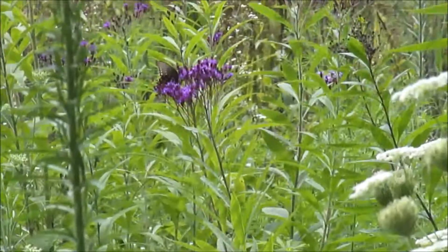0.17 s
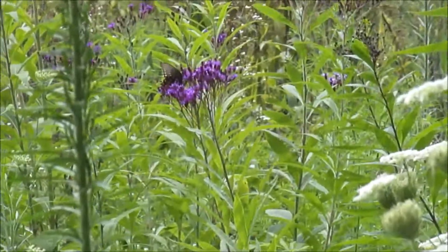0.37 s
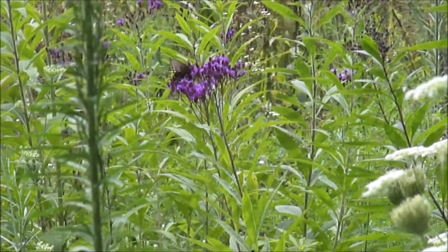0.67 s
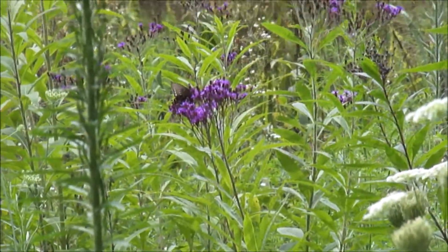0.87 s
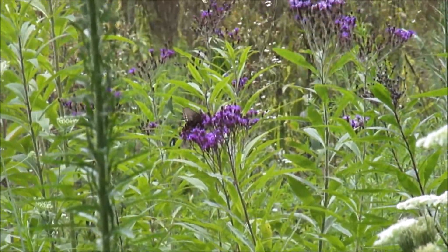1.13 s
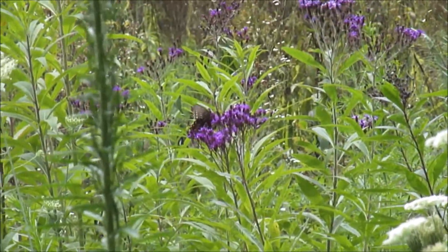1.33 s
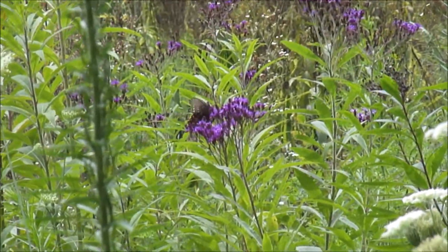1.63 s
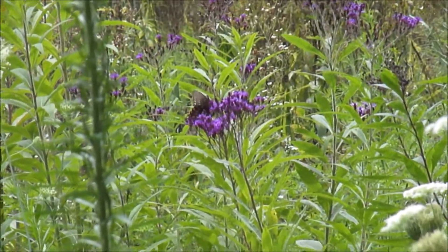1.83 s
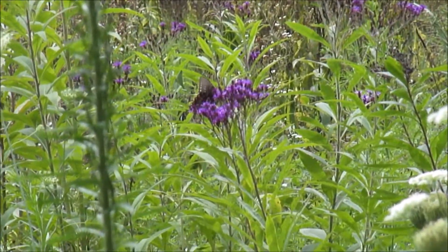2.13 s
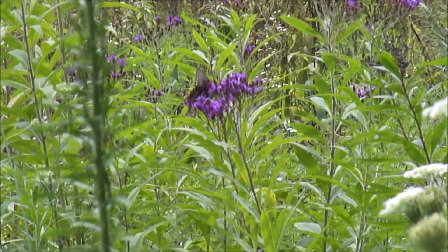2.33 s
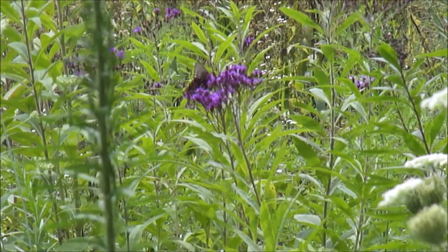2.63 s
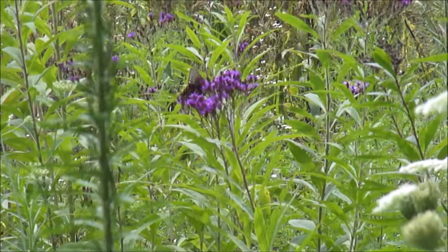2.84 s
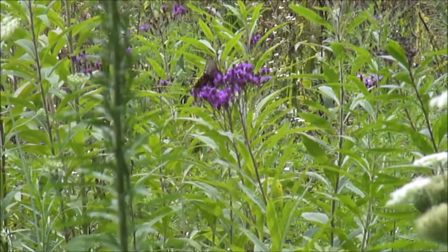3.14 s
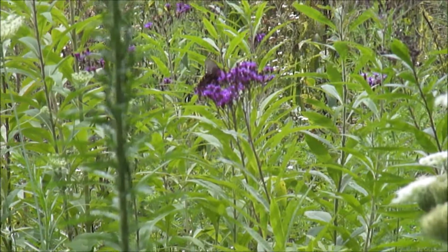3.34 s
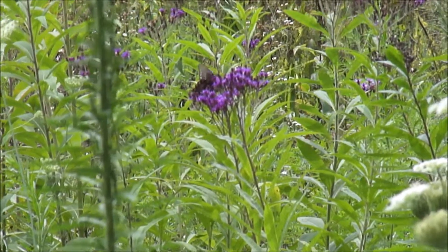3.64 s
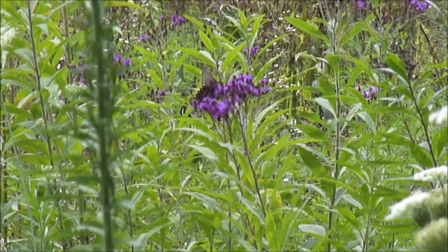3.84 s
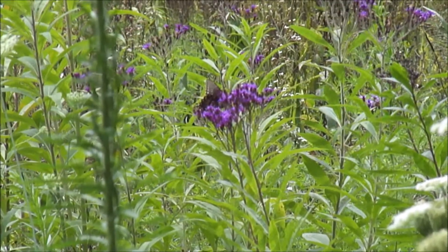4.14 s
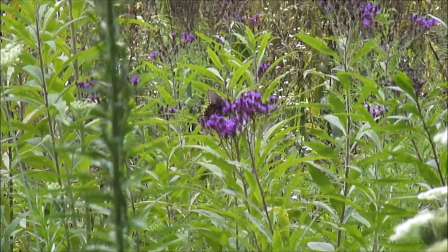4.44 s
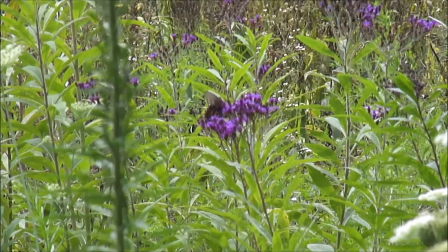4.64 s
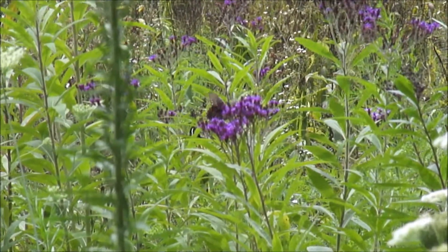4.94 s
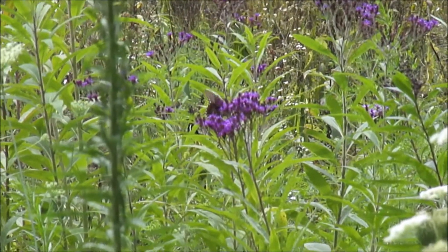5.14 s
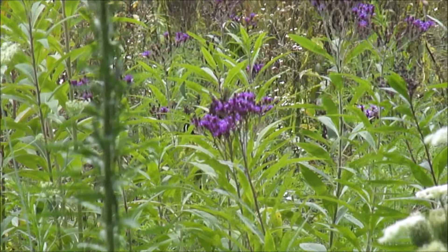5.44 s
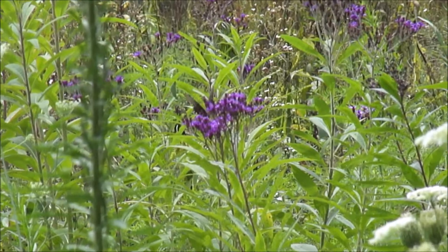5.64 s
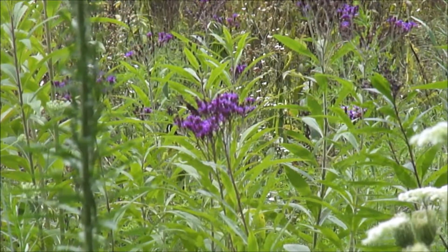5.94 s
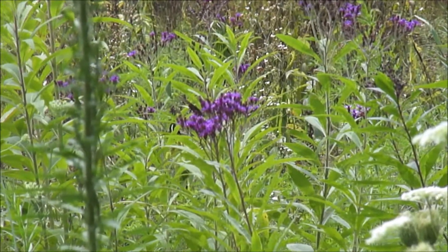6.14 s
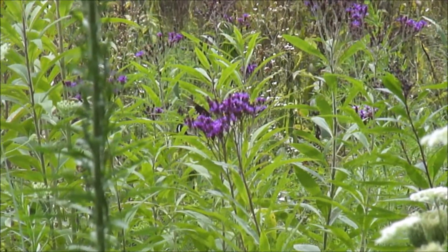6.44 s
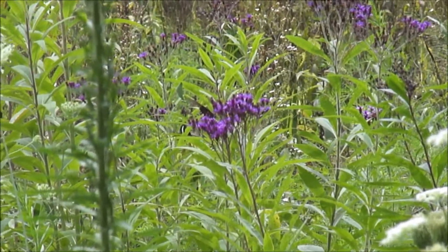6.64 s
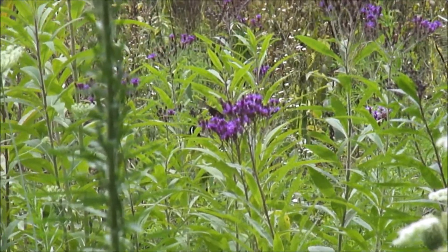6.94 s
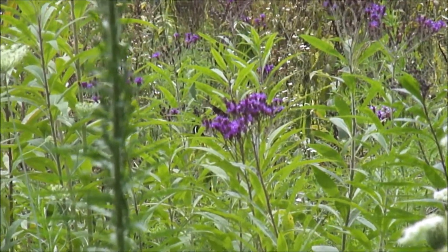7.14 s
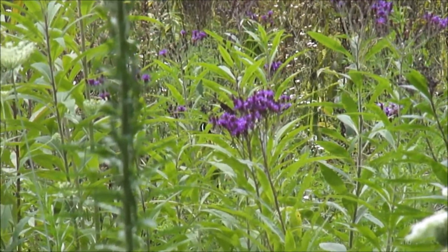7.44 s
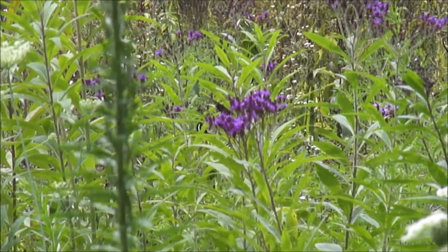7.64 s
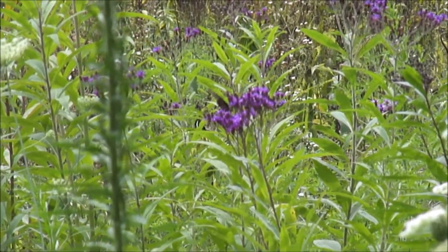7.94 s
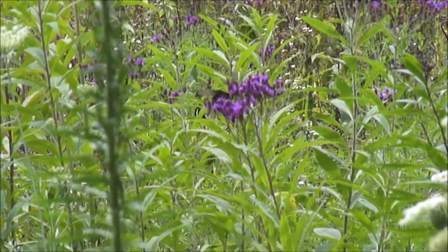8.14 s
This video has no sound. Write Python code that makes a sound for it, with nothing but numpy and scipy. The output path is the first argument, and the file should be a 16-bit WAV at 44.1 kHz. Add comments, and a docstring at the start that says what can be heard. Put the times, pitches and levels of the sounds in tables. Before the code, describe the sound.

A near cicada throbs faster and fades away over a dense, sizzling meadow chorus of crickets and katydids, with a faint distant road murmur.

```python
"""A summer meadow, one microphone. Close by, a cicada throbs faster and fades: clicks ring its tymbals and belly.
Farther off, coloured noise and tiny rasps make a dense chorus; pulsed tones make trilling crickets, a thin one late.
Katydids buzz at the top as noise cut by wing strokes. A distant road murmurs underneath as dark noise, with
wavering tones for tyre hum and an engine's whine. One light tick is heard, and the sound around the insects'
buzz dips briefly now and then."""
import sys
import numpy as np
from scipy import signal
from scipy.fft import rfft, irfft
from scipy.io import wavfile
from scipy.ndimage import uniform_filter1d

SR = 44100
rng = np.random.default_rng(int(sys.argv[2]) if len(sys.argv) > 2 else 0)


def master_out(mix):
    """Clip the mix to full scale and print it as 16-bit PCM to the path in sys.argv[1]."""
    frames = np.transpose(np.atleast_2d(mix))
    ceiling = np.clip(frames, -1, 1)
    pcm = np.round(ceiling * 32767).astype(np.int16)
    wavfile.write(sys.argv[1], SR, pcm)


N = 366030
TIME = np.arange(N) / SR  # s

# the near cicada's tymbal ring: f/Hz, relative density/dB per Hz
TYMBAL_SPECTRUM = [(1800, -37), (2500, -12), (3200, -16.5), (4300, -6.5), (5700, -13), (6300, 4),
                   (6550, 2.5), (6800, -2), (7050, 3), (7350, 5), (7650, -4), (8000, 3), (8600, -3.5),
                   (9700, -19.5), (10600, -48)]
# what its abdomen radiates well, as a relative spectrum: f/Hz, gain/dB
BELLY_RADIATION = [(1500, -38), (2600, 0), (3200, 12), (3400, 3.5), (3700, 6), (4200, -7), (4500, -10.5),
                   (4950, 6.5), (5650, 0.5), (6100, -2), (6500, -2.5), (7000, -2), (9000, -18)]
# how fast it throbs: t/s, throb rate/Hz
CICADA_THROBS = [(0, 7.785), (.6, 8.117), (1.6, 8.469), (2.3, 10.724), (3, 12.53), (3.6, 12.27), (5, 14.1)]
# its song holds, then dies away: t/s, level/dB
CICADA_LEVEL = [(0, -25), (1.1, -24.5), (2.1, -24), (3.1, -26.5), (3.55, -28), (4, -32), (4.35, -36.5),
                (4.9, -37.5), (5.5, -55)]
FIRST_THROB_S = .061


def cicada(cycles_per_s=366, full_lift_per_s=9.1, tymbal_db=0.5, belly_db=-4.0, ground_share=0.25):
    """Buckling tymbals click; with each throb the abdomen lifts and its resonance sweeps up and back."""
    rate = curve(CICADA_THROBS)[0]
    throb = np.cumsum(rate) / SR
    throb = throb - np.interp(FIRST_THROB_S, TIME, throb)
    lift = (.5 + .5 * np.cos(2 * np.pi * throb)) ** 2
    # between quick throbs the abdomen has no time to sink all the way
    depth = np.minimum(full_lift_per_s / rate, 1) ** .5
    lift = 1 - depth * (1 - lift)

    # the buckling slows a little as the abdomen lifts, and jitters
    unsteadiness = 1 - .08 * (lift - .5) + .026 * drift(120)
    cycles = np.cumsum(cycles_per_s * unsteadiness) / SR
    # two ribs buckle in each cycle; the first is stronger and does most to drive the abdomen
    rib = np.floor(2 * cycles)
    snap_size = gain_of(1.45 * rng.standard_normal(N))
    snaps = np.diff(rib, prepend=0) * rng.choice([-1, 1], N) * snap_size
    first = snaps * (1 - rib % 2)
    second = snaps * (rib % 2)

    belly_hz, width_hz = 4100 + 1800 * lift, 1350
    belly = resonate(first + .4 * second, belly_hz, width_hz)
    belly = resonate(belly, belly_hz, width_hz) * gain_of(6.5 * lift)
    tymbal = colour(first + .8 * second, TYMBAL_SPECTRUM) * gain_of(1.1 * (lift - .5))
    song = gain_of(tymbal_db) * tymbal + gain_of(belly_db) * colour(belly, BELLY_RADIATION)
    # the ground's echo, 1/468 s late, combs the spectrum
    ground = np.roll(song, round(SR / 468))
    song = scatter(song + ground_share * ground, t60=.08, wet_db=-4.5)
    return gain_of(curve(CICADA_LEVEL)[0]) * evened(song)


# the far chorus: f/Hz, relative density/dB per Hz
CHORUS_SPECTRUM = [(1120, -76), (1900, -27), (2320, -17.5), (2830, -9), (3500, -4.5), (4050, -1.5),
                   (4390, -2.5), (5680, -1.5), (8080, 0.5), (8510, -1.5), (8760, -15), (9430, -16),
                   (9640, -20), (11000, -23.5), (14300, -60), (22000, -120)]
# its mean level: t/s, level/dB
CHORUS_LEVEL = [(0, -29), (2.5, -29), (3.5, -32.5), (4.3, -30), (5, -29.5), (5.6, -30), (6.3, -30.5),
                (7, -30.5), (7.6, -30.5), (8.3, -31.5)]
# the lower-voiced part of the chorus: f/Hz, relative density/dB per Hz
LOW_CHORUS_SPECTRUM = [(1900, -33.5), (2600, -13), (3300, -12.5), (3700, -8.5), (4050, -8), (4350, -5.5),
                       (4700, -24), (5500, -41)]
# its mean level: t/s, level/dB
LOW_CHORUS_LEVEL = [(0, -40), (2, -43), (3.5, -38), (4.5, -37.5), (5.3, -39), (6.2, -39.5), (6.8, -41),
                    (7.4, -46), (8.3, -50)]


def chorus(rasps_per_s=2500, rasp_db=-5, rasp_size_db=3):
    """Countless far insects merge into a sizzle; the nearer ones stand out as tiny rasps."""
    moments = rng.random(N) < rasps_per_s / SR
    sizes = gain_of(rasp_size_db * np.minimum(rng.exponential(1, N), 4))
    rasps = moments * rng.choice([-1, 1], N) * sizes
    sizzle = rng.standard_normal(N) + gain_of(rasp_db) * evened(rasps)
    high = strands(colour(sizzle, CHORUS_SPECTRUM), patchy_db=3.0)
    high = high * gain_of(curve(CHORUS_LEVEL)[0] + 0.35 * drift(33))
    low = colour(rng.standard_normal(N), LOW_CHORUS_SPECTRUM)
    low = low * strokes(10, wander=0.14, sharpness=0.27)
    return high + low * gain_of(curve(LOW_CHORUS_LEVEL)[0] + 0.95 * drift(16))


def strands(x, patchy_db, width_hz=40, length_s=.25):
    """Narrow strands of pitch come forward and sink back as single singers do."""
    hz, s, z = signal.stft(x, SR, nperseg=2048, noverlap=1536)
    bins = max(round(width_hz / hz[1]), 1)
    frames = max(round(length_s / s[1]), 1)
    patches = uniform_filter1d(rng.standard_normal(z.shape), bins, axis=0)
    patches = evened(uniform_filter1d(patches, frames, axis=1))
    patchy = signal.istft(z * gain_of(patchy_db * patches), SR, nperseg=2048, noverlap=1536)[1]
    return evened(patchy[:N])


# single trilling crickets: mean f/Hz, mean wing-stroke rate/Hz, level/dB
STEADY_CRICKETS = [(7840, 29.6, -42), (7370, 58, -44.5), (6870, 63, -47.5), (6490, 30, -45),
                   (4117, 41, -45.5), (3155, 52, -50.5), (4935, 47, -46)]
# the late thin trill: t/s, level/dB
LATE_TRILL_LEVEL = [(0, -90), (6.4, -78), (6.7, -63), (7, -51), (7.6, -52.5), (8.3, -48)]


def crickets():
    """Wing strokes pulse each singer's tone: the steady trillers and the late high one."""
    steady = sum(gain_of(db) * cricket(hz, per_s, spread=.018) for hz, per_s, db in STEADY_CRICKETS)
    late = cricket(hz=9160, per_s=62, spread=0.0098)
    return steady + gain_of(curve(LATE_TRILL_LEVEL)[0]) * late


def cricket(hz, per_s, spread):
    """A scraper drawn over the wing's file: a pulsed tone whose pitch is never quite steady."""
    pitch = hz * (1 + spread * drift(151.8))
    tone = np.sin(2 * np.pi * np.cumsum(pitch) / SR)
    trill = tone * strokes(per_s, wander=0.0218, sharpness=0.92)
    return evened(scatter(trill, t60=0.089, wet_db=-3))


# the katydids' buzz: f/Hz, relative density/dB per Hz
KATYDID_SPECTRUM = [(7500, -25), (8800, 10.5), (9400, -0.5), (10200, 3), (11000, -1), (12000, -22)]
# their song: t/s, level/dB, mean wing-stroke rate/Hz
KATYDID_STROKES = [(0, -38.5, 174), (1.2, -38.5, 184), (2.9, -40, 182), (3.3, -41, 141), (4.5, -45, 120),
                   (5.6, -45.5, 119.5), (5.85, -58, 122), (8.3, -70, 120)]


def katydids():
    """Quick wing strokes, each a dry rasp of noise."""
    db, per_s = curve(KATYDID_STROKES)
    rasps = rng.standard_normal(N) * strokes(per_s, wander=0.0139, sharpness=0.44)
    return gain_of(db) * colour(rasps, KATYDID_SPECTRUM)


# a small tick, as of a finger on the equipment: f/Hz, relative level/dB, t60/s
TICK_RING = [(514, 0.5, 0.027), (720, 1, 0.0091), (1000, 2, 0.0083), (1300, -6, 0.0075), (1620, 2.5, 0.016)]
TICK_S, TICK_DB = 1.7895, -32.5


def tick(low_hz=400, high_hz=2000):
    """One light, bodiless knock: a few modes that die at once, band-limited."""
    t = np.maximum(TIME - TICK_S, 0)
    ring = 0
    for hz, db, t60 in TICK_RING:
        ring = ring + gain_of(TICK_DB + db - 60 * t / t60) * np.sin(2 * np.pi * hz * t)
    return signal.sosfilt(signal.butter(2, [low_hz, high_hz], "bandpass", fs=SR, output="sos"), ring)


# the distant road's murmur: f/Hz, relative density/dB per Hz
ROAD_SPECTRUM = [(15, -60), (25, -24), (140, -10), (353, -5), (403, -6.5), (435, -5.5), (612, -5.5),
                 (685, -3.5), (753, -5.5), (963, -7.5), (1060, -7), (1260, -10), (1670, -10), (1940, -13.5),
                 (2300, -12), (2990, -37), (5060, -120)]
ROAD_DB = -49.5
# the tyre hum's tones: f/Hz, width/Hz, relative level/dB, share of the swell (in dB) that each follows
TYRE_TONES = [(699, 3.1, -0.5, 0.93), (1044, 12.1, 0, 0.57), (1097, 26, -10.5, 0.91), (1720, 38, -4, 0.22),
              (1565, 19, -9, .2), (511, 5.4, -10, 0.81)]
# the hum swells over a faint steady level: start t/s, length/s, full-share level/dB
TYRE_SWELLS = [(1.12, 0.18, -58), (2.8, 0.76, -57.5), (3.75, 0.79, -51), (4.45, 1.15, -53.5),
               (5.6, 1.15, -53), (7.55, .85, -53.5)]
HUM_REST_DB = -66.5
# an engine's brief whines over a fainter steady tone: start t/s, length/s, level/dB
ENGINE_WHINES = [(7.02, .3, -55), (7.85, 0.21, -58)]
WHINE_HZ, WHINE_WIDTH_HZ, WHINE_REST_DB = 443.5, 4, -65


def road(unsteady_db=1.45):
    """A soft murmur of noise; narrow tones of tyre hum and an engine's whine swell and sink over it."""
    murmur = colour(rng.standard_normal(N), ROAD_SPECTRUM) * gain_of(ROAD_DB + unsteady_db * drift(22))
    swell_db = swells(TYRE_SWELLS, HUM_REST_DB)
    hum = 0
    for hz, width, db, share in TYRE_TONES:
        hum = hum + gain_of(HUM_REST_DB + db + share * swell_db) * far_tone(hz, width)
    whine_db = WHINE_REST_DB + swells(ENGINE_WHINES, WHINE_REST_DB)
    return murmur + hum + gain_of(whine_db) * far_tone(WHINE_HZ, WHINE_WIDTH_HZ)


def swells(rows, rest_db, edge_s=.1):
    """Decibels above a resting level: each swell rises, holds and falls."""
    rises = []
    for start, length, db in rows:
        inside = np.minimum(TIME - start, start + length - TIME)  # s from the nearer end
        rises.append((db - rest_db) * np.clip(.5 + inside / edge_s, 0, 1))
    return np.max(rises, axis=0)


def far_tone(hz, width, fading_db=2.5):
    """A narrow tone that wavers and fades on the air."""
    turns = np.cumsum(hz + width / 2 * drift(width)) / SR
    return evened(np.sin(2 * np.pi * turns) * gain_of(fading_db * drift(6.9)))


# brief dips of the sound around the buzz, the deeper the longer: t/s, depth/dB
BRIEF_DIPS = [(0.521, 16), (0.83, 15), (.885, 14), (1.525, 12), (1.886, 13), (2.029, 17), (2.462, 12),
              (2.868, 14), (3.202, 14), (3.265, 12), (3.372, 18), (3.541, 26.5), (5.34, 5.5), (5.53, 8.5),
              (6.26, 8.5), (6.91, 10.5), (7.165, 8), (7.375, 11.5), (7.67, 14), (7.885, 7), (8.268, 17)]
DIP_S_PER_DB = .0012  # length per dB of depth, between the points where 1/e of the depth is left


def dipped(x, low_hz=3400, high_hz=8800):
    """Now and then everything below and above the insects' buzz dips for a moment."""
    buzz = signal.sosfiltfilt(signal.butter(4, [low_hz, high_hz], "bandpass", fs=SR, output="sos"), x)
    dip_db = 0
    for s, depth in BRIEF_DIPS:
        dip_db = dip_db + depth * np.exp(-(2 * (TIME - s) / (DIP_S_PER_DB * depth)) ** 2)
    return buzz + (x - buzz) * gain_of(-dip_db)


def scatter(x, t60, wet_db):
    """Stems and leaves add a short diffuse tail."""
    t = TIME[:SR // 4]
    tail = evened(rng.standard_normal(len(t)) * gain_of(-60 * t / t60)) / np.sqrt(len(t))
    return x + gain_of(wet_db) * signal.oaconvolve(x, tail)[:N]


def strokes(per_s, wander, sharpness):
    """The swell of each wing stroke, at a slightly unsteady rate."""
    turns = np.cumsum(per_s * (1 + wander * drift(3.2))) / SR
    return evened(np.exp(sharpness * np.cos(2 * np.pi * turns)))


def resonate(x, hz, width):
    """A resonance of gain one that follows the curve hz: shift to zero, smooth, shift back."""
    turn = np.exp(2j * np.pi * np.cumsum(hz * np.ones(N)) / SR)
    r = np.exp(-np.pi * width / SR)
    return 2 * (turn * signal.lfilter([1 - r], [1, -r], x / turn + 1e-18)).real


def drift(per_s):
    """Slow chance with an rms of one, changing about so often a second."""
    hz = np.fft.rfftfreq(N, 1 / SR)
    return evened(irfft(rfft(rng.standard_normal(N)) / (1 + (hz / per_s) ** 4), N))


def colour(x, points):
    """Filters by a (f/Hz, gain/dB) spectrum; the result has an rms of one."""
    f, db = np.transpose(points)
    hz = np.fft.rfftfreq(N, 1 / SR)
    gain_db = np.interp(np.log(hz + 1), np.log(f + 1), db, left=-90, right=-90)
    return evened(irfft(rfft(x) * gain_of(gain_db), N))


def curve(rows):
    """Each column of a timed table, drawn out to every sample."""
    s, *columns = np.transpose(rows)
    return [np.interp(TIME, s, c) for c in columns]


def evened(x):
    """Scales to an rms of one."""
    return x / np.sqrt(np.mean(abs(x) ** 2) + 1e-20)


def gain_of(db):
    """Decibels to amplitude."""
    return 10 ** (np.asarray(db) / 20)


def scene():
    """The meadow, the same in both channels."""
    meadow = dipped(cicada() + chorus() + crickets() + katydids() + tick() + road())
    return np.array([meadow, meadow])


def record(dry, low_cut_hz=42, edge_hz=11030):
    """The microphone's bass roll-off and the recorder's band limit."""
    thin = signal.sosfilt(signal.butter(2, low_cut_hz, "highpass", fs=SR, output="sos"), dry)
    band_limit = signal.firwin(1023, edge_hz, window=("kaiser", 9), fs=SR)
    return signal.oaconvolve(thin, band_limit[None], "same")


dry = scene()
out = record(dry)
master_out(out)
```